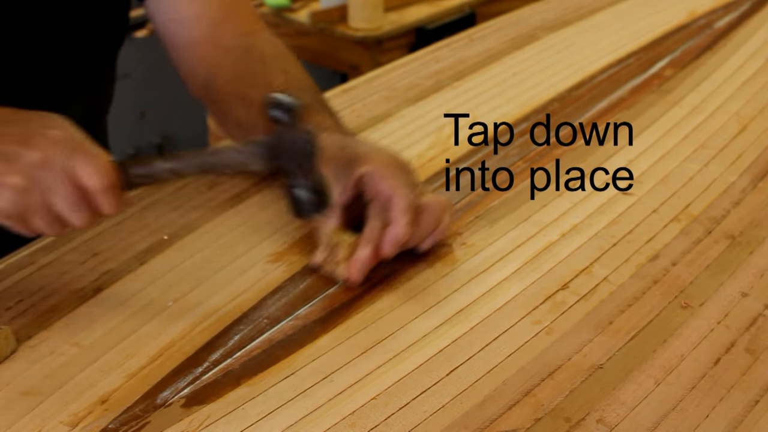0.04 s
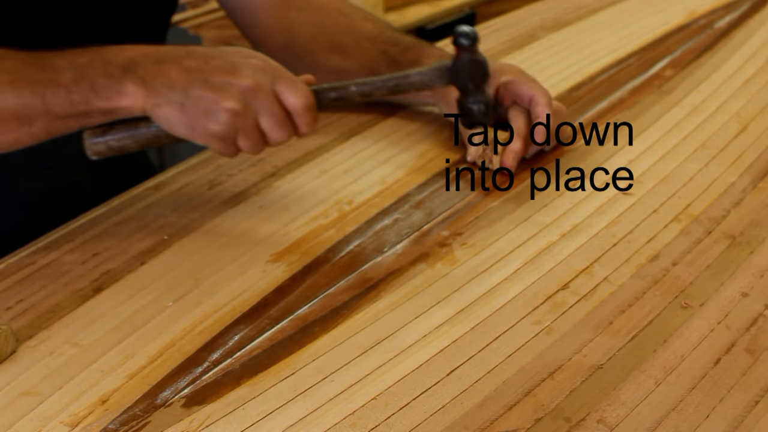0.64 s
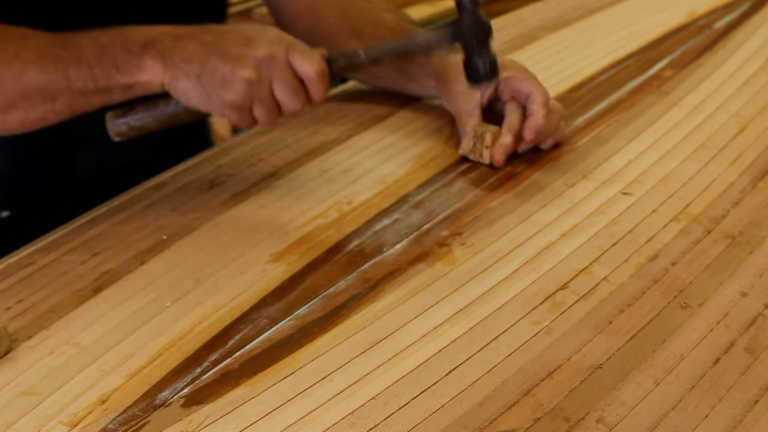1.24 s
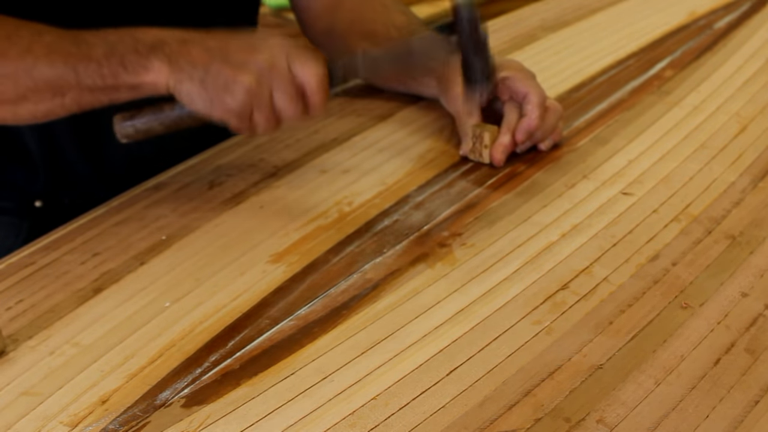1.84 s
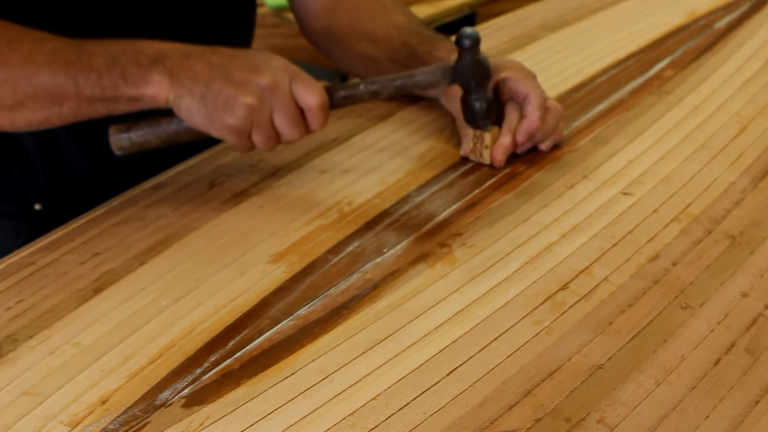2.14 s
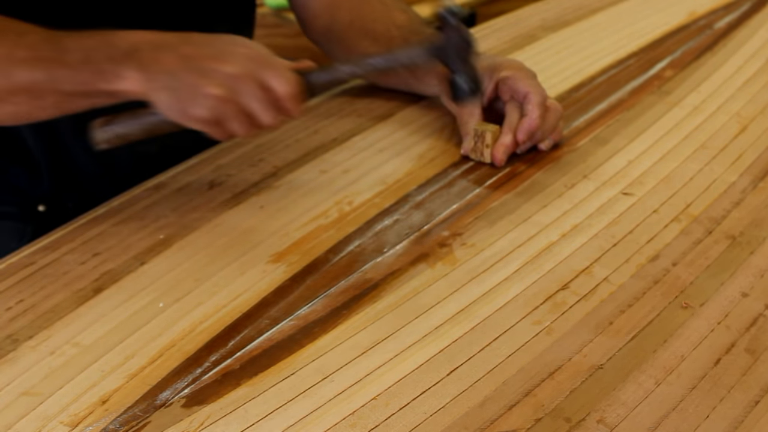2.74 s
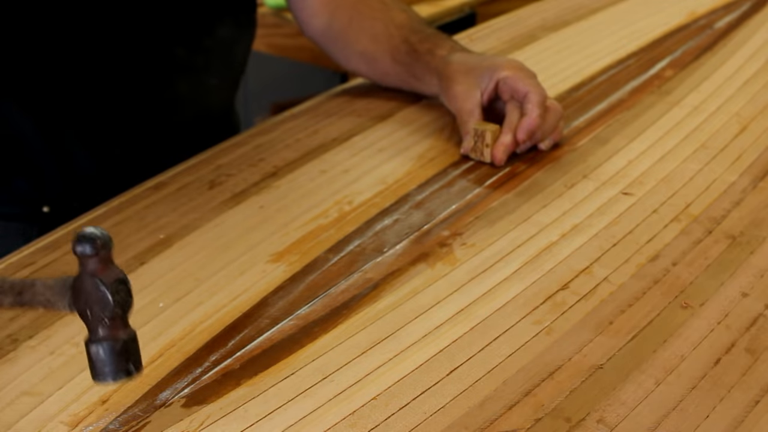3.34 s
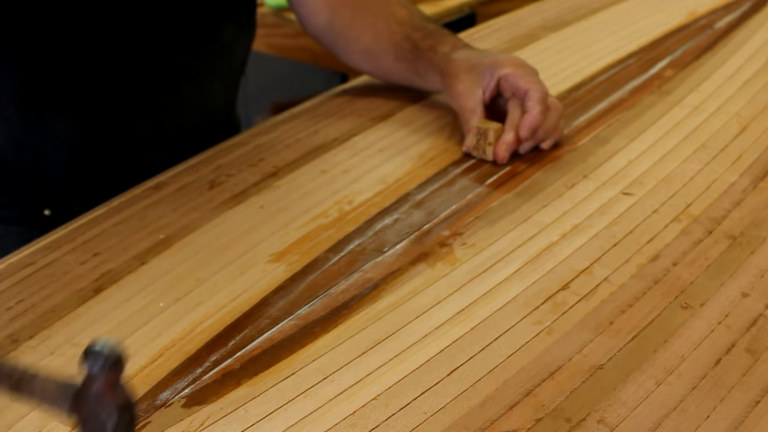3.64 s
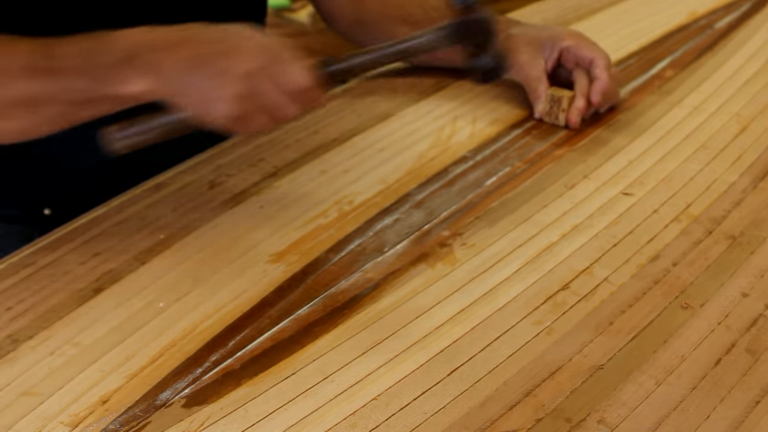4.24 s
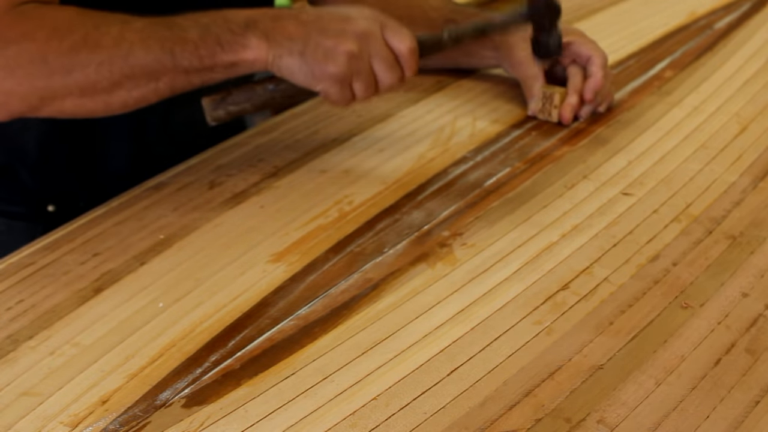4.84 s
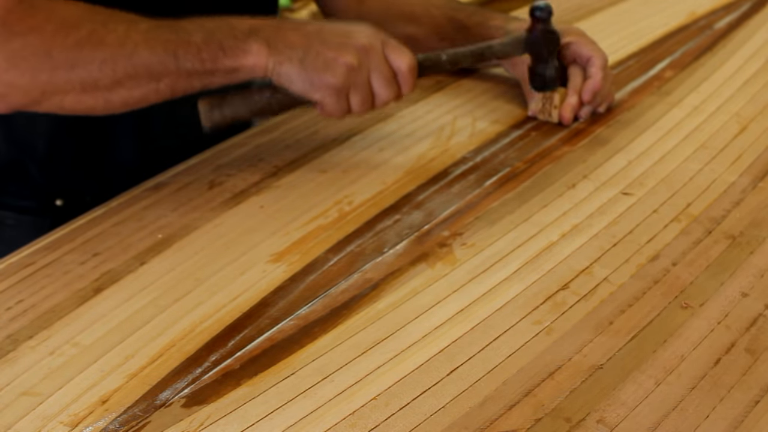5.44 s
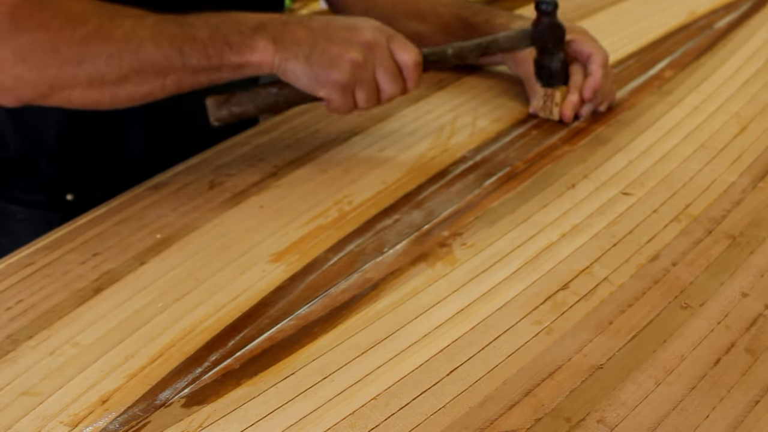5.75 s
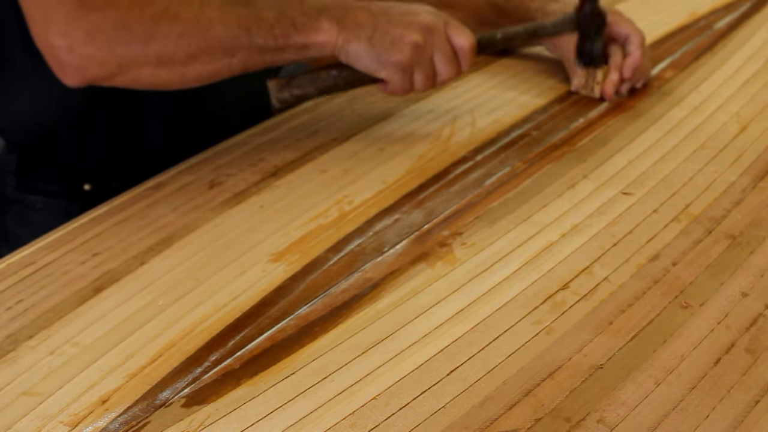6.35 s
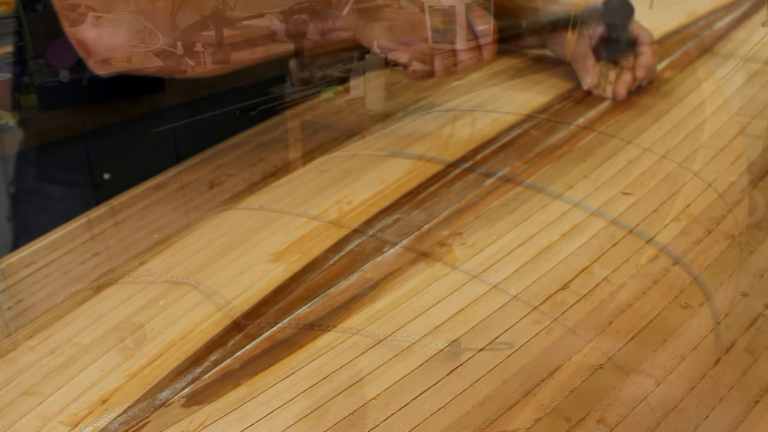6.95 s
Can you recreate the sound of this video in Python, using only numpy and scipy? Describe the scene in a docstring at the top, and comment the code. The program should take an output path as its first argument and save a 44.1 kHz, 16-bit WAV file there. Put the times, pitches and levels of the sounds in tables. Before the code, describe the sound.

Quick, sharp hammer taps on wood ring through a wooden hull in a workshop, pausing briefly for faint knocks and rubs.

```python
"""In a workshop, a wooden strip is pressed by hand into a boat hull and tapped home with a light hammer.
Each tap runs through the planking as a falling chirp and rings the hull and the room.
Wood sticks and slips on wood, strip and hammer knock on the hull, fingers hiss over the grain.
The close microphone overloads; its gain control ducks after loud taps and lets the hiss swell in pauses."""
import sys
import numpy as np
from scipy import signal
from scipy.fft import rfft, irfft
from scipy.io import wavfile
from scipy.ndimage import minimum_filter1d

SR = 44100
rng = np.random.default_rng(int(sys.argv[2]) if len(sys.argv) > 2 else 0)


def dump(signal):
    """Clip the signal to [-1, 1] and save it as 16-bit WAV at the path in sys.argv[1]."""
    limited = np.clip(np.atleast_2d(signal).T, -1, 1)
    pcm = np.round(limited * 32767).astype(np.int16)
    wavfile.write(sys.argv[1], SR, pcm)


N = 308259
TIME_S = np.arange(N) / SR
AGE_S = np.arange(SR) / SR  # time axis of one blow


def amp(db):
    """Decibels to gain."""
    return 10 ** (np.asarray(db) / 20)


def unit(x):
    """Scale to rms 1."""
    return x / np.sqrt(np.mean(x ** 2) + 1e-20)


def decay(age_s, t60_s):
    """Exponential fall, 60 dB in t60_s."""
    return np.exp(-np.log(1000) * age_s / t60_s)


def rise(rise_s):
    """Exponential onset of a blow."""
    return 1 - np.exp(-AGE_S / rise_s)


def curve_at(points, hz):
    """Interpolate on a log-frequency axis."""
    freq_hz, value = np.transpose(points)
    return np.interp(np.log(hz + 1), np.log(freq_hz), value)


def add(mix, start_s, sound):
    """Mix a sound in at start_s."""
    start = round(start_s * SR)
    sound = sound[max(-start, 0):]
    part = mix[max(start, 0):][:len(sound)]
    part += sound[:len(part)]


def colour(x, spectrum):
    """Shape x by a spectrum, at rms 1."""
    gain = amp(curve_at(spectrum, np.fft.rfftfreq(len(x), 1 / SR)))
    return unit(irfft(rfft(x) * gain, len(x)))


def cut(x, hz, kind, order):
    """Causal low-pass or high-pass."""
    return signal.sosfilt(signal.butter(order, min(hz, SR / 2 - 1000), kind, fs=SR, output="sos"), x)


# workshop decay: freq_hz, t60_s
ROOM_DECAY = [(80, 0.75), (300, 0.55), (1500, 0.55), (4000, 0.51), (8000, 0.39), (15000, 0.061)]


def room_fade(x):
    """Each band fades at the pace of the workshop."""
    hz, age_s, bands = signal.stft(x, SR, nperseg=512)
    faded = bands * decay(age_s, curve_at(ROOM_DECAY, hz)[:, None])
    return signal.istft(faded, SR, nperseg=512)[1][:len(x)]


def in_room(x, wet_db):
    """Add workshop reverberation."""
    tail = room_fade(rng.standard_normal(SR)) * rise(0.003)
    return x + amp(wet_db) * signal.fftconvolve(x, tail / np.linalg.norm(tail))[:N]


# strip and hull modes by place struck: pitch_hz, t60_s, place0_db, place1_db, place2_db, place3_db
HULL_MODES = [(80.7, 0.093, -17, -38.5, -14, -45), (132.1, 0.57, -31, -28, -24, -24),
              (169, 0.27, -34, -27, -27.5, -23), (241, 0.57, -47.5, -26, -26.5, -28),
              (255, 0.028, 3, -3, 2.5, -6), (287, 0.14, -64.5, -29, -21, -41),
              (310.5, 0.49, -30.5, -17, -18.5, -33), (329.4, 0.45, -13, -14.5, -27.5, -28.5),
              (361, 0.26, -19.5, -19, -43, -47), (378, 0.027, -17.5, -1.5, 1, -9),
              (481.5, 0.41, -25, -29, -19, -32), (522.4, 0.033, -1, -2, 2.5, 5),
              (613, 0.25, -14.5, -19.5, -20.5, -20), (690, 0.024, -48.5, -29, -10, -30),
              (844, 0.14, -11.5, -12.5, -20, -13), (948, 0.021, -79.5, -52, -26, -7.5),
              (1072, 0.0054, -45.5, -68, -35, 8.5), (1286, 0.031, 3, -1, -12.5, -3),
              (1483, 0.019, -8.5, 1, -60, -5.5), (1552, 0.025, -5.5, -26, -9.5, -28),
              (1817, 0.031, -16, -25.5, -12, -4), (2056, 0.015, -12, -11.5, -2, -6),
              (2300, 0.015, -13.5, -1.5, -5.5, -32), (2604, 0.015, -12.5, -6, -5.5, -1.5),
              (2968, 0.012, -1, -2.5, 1.5, -1.5), (3498, 0.0027, -9.5, -50, 7.5, 11),
              (4126, 0.015, -17, -1.5, -47.5, -4.5), (4495, 0.0062, 7, 7.5, 10.5, 8.5),
              (5168, 0.0024, 10.5, 16, 14.5, 13)]


def hull_modes(place, dispersion=0.1559, rise_cycles=0.97):
    """Bending waves travel as the root of frequency, so high modes arrive first: a falling chirp."""
    table = np.array(HULL_MODES)
    hz, t60_s, level_db = table[:, :1], table[:, 1:2], table[:, 2 + place, None]
    delay_s = dispersion * (hz ** -.5 - hz.max() ** -.5)
    age_s = np.maximum(AGE_S - delay_s, 0)
    sign = (-1) ** np.arange(len(hz))[:, None]  # neighbouring modes swing in opposite senses
    swell = 1 - np.exp(-age_s * hz / rise_cycles)
    return (sign * amp(level_db) * swell * decay(age_s, t60_s) * np.sin(2 * np.pi * hz * age_s)).sum(0)


# hammer moves to the next place on the strip: time_s
PLACE_CHANGES = [1.6, 4.0, 6.0]
# dense ringing of hull and room: freq_hz, density_db
RING_SPECTRUM = [(30, -56.5), (55, -19.5), (80, -6.5), (160, -7), (300, 5.5), (550, 1), (800, -3.5),
                 (1400, -7), (2500, -13.5), (4500, -18.5), (7000, -21.5), (10000, -23.5), (16000, -46.5)]
# taps: start_s, force_db, corner_hz, click_db, thump_db
HAMMER_TAPS = [(-.07, 11, 6170, -18, -3), (0.9674, 21, 6260, -26, -24), (1.214, 23.5, 5900, -19, 0),
               (1.4791, 20, 4360, -15, 7.5), (1.734, 18.5, 5000, -12, -13), (1.9806, 24, 5800, -11.5, -18),
               (2.2334, 19, 5540, -14.5, -3), (2.466, 17.5, 5800, -15.5, -3),
               (2.7045, 15.5, 6340, -11.5, 1.5), (4.7396, 2, 6600, -15, 6.5),
               (5.0053, 11, 5500, -10.5, -1.5), (5.249, 18.5, 5150, -8, 7),
               (5.4955, 16.5, 4840, -14.5, 8.5), (5.7359, 14, 4930, -8, 6.5), (6.2081, 7, 5060, -28, 2.5),
               (6.4458, 17, 7540, -18, -1.5), (6.9202, 11, 6830, -24, -5.5)]


def hammer(tail_db=-11.0, scatter_db=-2.0, scatter_t60_s=0.032, rise_s=0.00033, shared=0.75, thump_hz=130):
    """Each tap rings the modes of its place, then scatters through the planks and into the room."""
    out = np.zeros(N)
    modes = [hull_modes(place) for place in range(len(PLACE_CHANGES) + 1)]
    echoes = rng.standard_normal((len(modes), SR))
    for start_s, force_db, corner_hz, click_db, thump_db in HAMMER_TAPS:
        place = np.searchsorted(PLACE_CHANGES, start_s)
        # taps at one place share most echo paths
        fresh = np.sqrt(1 - shared ** 2) * rng.standard_normal(SR)
        paths = colour(shared * echoes[place] + fresh, RING_SPECTRUM)
        scatter = amp(scatter_db) * paths * decay(AGE_S, scatter_t60_s)
        tail = (scatter + amp(tail_db) * room_fade(paths)) * rise(rise_s)
        # softer contact, less treble; the first touch of steel lets a little through
        click = amp(click_db) * cut(tail, corner_hz, "high", order=8)
        tap = modes[place] + cut(tail, corner_hz, "low", order=8) + click
        # bass shelf: a well seated strip passes more push to the whole hull
        tap += (amp(thump_db) - 1) * cut(tap, thump_hz, "low", order=1)
        add(out, start_s, amp(force_db) * tap)
    return out


# workshop background: freq_hz, density_db
AIR_SPECTRUM = [(15, -50), (25, -14), (113, -0.5), (173, -8.5), (399, 0), (537, -7), (582, 1.5),
                (631, -5.5), (684, -4.5), (997, -6), (1080, -7.5), (1710, -13.5), (2630, -13.5),
                (15500, -34)]


def air(level_db=-44):
    """Steady rumble and hiss of the workshop."""
    return amp(level_db) * colour(rng.standard_normal(N), AIR_SPECTRUM)


def stroke(start_s, length_s, gain_db, attack_s, release_t60_s):
    """Hand pressure builds, holds, then eases off."""
    grip = np.clip((TIME_S - start_s) / attack_s, 0, 1)
    released_s = np.maximum(TIME_S - start_s - length_s, 0)
    return amp(gain_db) * grip * decay(released_s, release_t60_s)


# wood rubbing on planking: freq_hz, density_db
RUB_SPECTRUM = [(24, -57), (40, -51.5), (71, 0.5), (211, -4), (291, 5), (355, 1), (582, -1), (643, -3),
                (728, -3.5), (1110, -8.5), (2990, -25.5), (4680, -28.5), (8270, -46), (15000, -49)]
# pushes: start_s, length_s, gain_db, highpass_hz
RUB_PUSHES = [(0.231, 0.08, -21.5, 45), (0.387, 0.14, -25, 60), (0.485, 0.087, -23, 220.4),
              (0.68, 0.36, -44.5, 40), (3.79, 0.1, -29, 180), (3.889, 0.052, -22, 150),
              (3.958, .05, -29.5, 150), (3.995, 0.064, -24.5, 120), (5.908, 0.075, -21, 80)]


def rubbing(slips_per_s=900, attack_s=0.025, release_t60_s=0.17):
    """Wood sticks and slips on wood: irregular little clicks sound through the hull."""
    slips = (rng.random(N) < slips_per_s / SR) * rng.choice([-1, 1], N)
    friction = colour(slips, RUB_SPECTRUM)
    out = np.zeros(N)
    for start_s, length_s, gain_db, highpass_hz in RUB_PUSHES:
        pressure = stroke(start_s, length_s, gain_db, attack_s, release_t60_s)
        out += cut(friction, highpass_hz, "high", order=1) * pressure
    return in_room(out, wet_db=-6.5)


# strip and hammer on the hull: start_s, level_db, low_hz, high_hz, scatter_t60_s, rise_s
HULL_KNOCKS = [(0.2521, -10.5, 103, 1130, 0.1, 0.00028), (0.4834, -17, 474, 4200, 0.076, 0.0004),
               (0.836, -35.5, 102, 6040, 0.11, 0.0014), (3.277, -22, 290, 1540, 0.18, 0.0044),
               (3.328, -29, 435, 1390, 0.31, 0.013), (3.354, -25, 524, 1400, 0.044, 0.0033),
               (3.6606, -15, 246, 1740, 0.13, 0.00025), (3.8883, -18, 237, 1490, .1, 0.00059),
               (4.215, -48.5, 1530, 6060, 0.039, 0.00083), (6.7192, -7.5, 1810, 3170, 0.043, 0.00056),
               (6.721, -9.5, 130, 420, 0.067, 0.0018)]


def knocks(dull_hz=600, hollow_db=-6, room_db=-3, room_rise_s=0.0091,
           tick_db=-18.5, tick_decay_s=0.0093, tick_hz=7500):
    """Dull contacts ring the hull in a narrower band, with a faint tick on top."""
    def dull_noise():
        return unit(cut(rng.standard_normal(SR), dull_hz, "low", order=1))

    out = np.zeros(N)
    onset = slice(SR // 100)  # first 10 ms
    for start_s, level_db, low_hz, high_hz, scatter_t60_s, rise_s in HULL_KNOCKS:
        scatter = dull_noise() * decay(AGE_S, scatter_t60_s)
        hollow = hull_modes(np.searchsorted(PLACE_CHANGES, start_s))
        wood = (amp(hollow_db) * hollow / hollow[onset].std() + scatter) * rise(rise_s)
        # room energy follows blow energy
        room = room_fade(dull_noise()) * rise(room_rise_s)
        wood += amp(room_db) * np.linalg.norm(wood) * room / np.linalg.norm(room)
        wood = cut(wood, high_hz, "low", order=3)
        wood = cut(wood, low_hz, "high", order=3)
        tick = cut(rng.standard_normal(SR), tick_hz, "low", order=2) * np.exp(-AGE_S / tick_decay_s)
        add(out, start_s, amp(level_db) * (wood / wood[onset].std() + amp(tick_db) * tick))
    return out


# skin on wood: freq_hz, density_db
SKIN_SPECTRUM = [(500, -21), (1500, 12.5), (2800, 9.5), (5000, 2), (9000, -5), (15000, -16)]
# slides: start_s, length_s, level_db
FINGER_SLIDES = [(.36, 0.23, -43.5), (0.708, .07, -36.5), (0.883, 0.11, -39), (1.55, .11, -28.5),
                 (5.909, 0.094, -38.5)]


def fingers(attack_s=0.041, release_t60_s=0.41):
    """Skin brushing over the grain hisses."""
    pressure = sum(stroke(*slide, attack_s, release_t60_s) for slide in FINGER_SLIDES)
    return colour(rng.standard_normal(N), SKIN_SPECTRUM) * pressure


def scene():
    """All sources, mono."""
    return (hammer() + air() + rubbing() + knocks() + fingers())[None]


def lag(x, tau_s):
    """One-pole smoothing from x[0]."""
    pole = np.exp(-1 / (tau_s * SR))
    return signal.lfilter([1 - pole], [1, -pole], x - x[0]) + x[0]


def gain_control(x, threshold_db=-6.5, sense_s=0.0047, attack_s=0.0014, hold_s=0.2,
                 recover_db_per_s=42, start_duck_db=9):
    """Gain drops within milliseconds of a loud sound, holds, then creeps back."""
    level_db = 10 * np.log10(abs(lag(x ** 2, sense_s)) + 1e-12)
    over_db = np.maximum(level_db - threshold_db, 0)
    over_db[0] = start_duck_db  # still down from the tap just before 0 s
    half_hold = int(hold_s * SR / 2)
    held_db = -minimum_filter1d(-over_db, 2 * half_hold + 1, origin=half_hold, mode="nearest")
    recovery_db = recover_db_per_s * TIME_S
    duck_db = np.maximum.accumulate(held_db + recovery_db) - recovery_db
    return x / amp(lag(duck_db, attack_s))


def record(dry, edge_hz=16000):
    """Gain control, hard overload on the first milliseconds of a tap, band limit."""
    clipped = np.clip(gain_control(dry[0]), -1, 1)
    lowpass = signal.firwin(255, edge_hz, window=("kaiser", 8), fs=SR)
    return signal.oaconvolve(clipped, lowpass, "same")[None]


dry = scene()
out = record(dry)
dump(out)
```